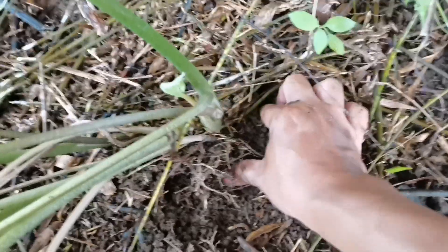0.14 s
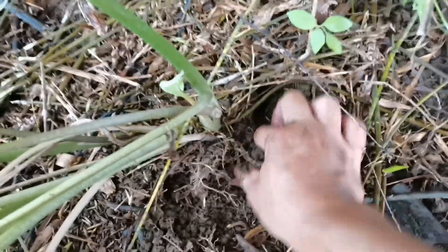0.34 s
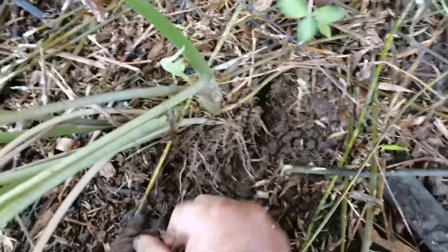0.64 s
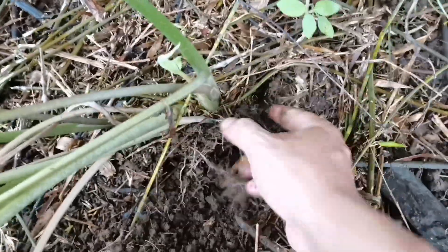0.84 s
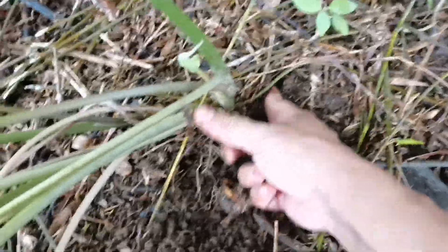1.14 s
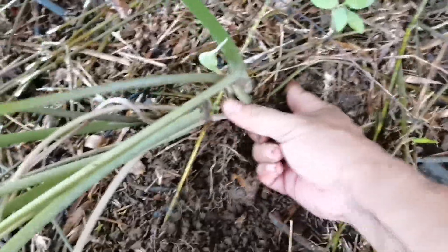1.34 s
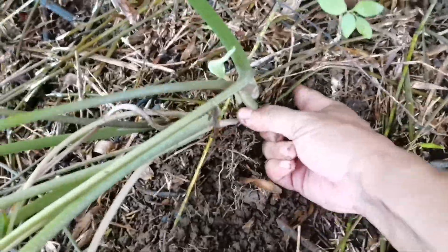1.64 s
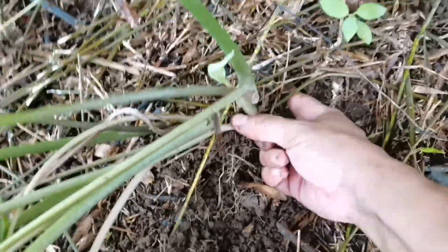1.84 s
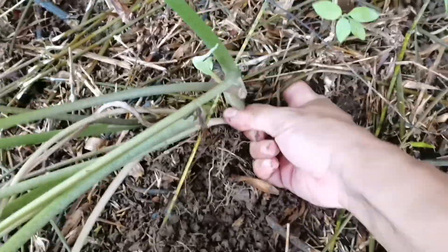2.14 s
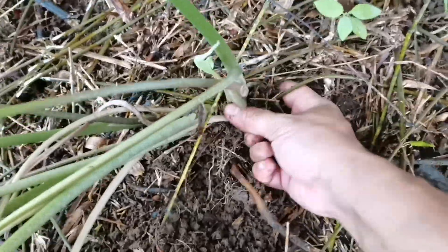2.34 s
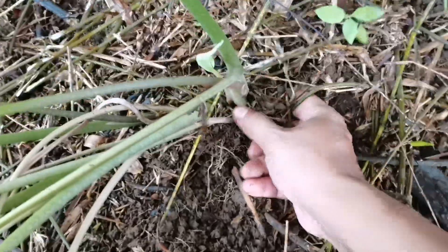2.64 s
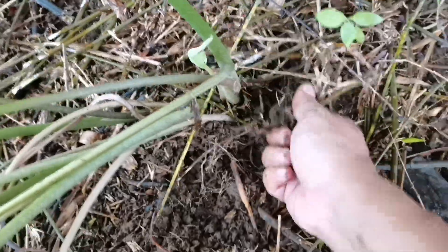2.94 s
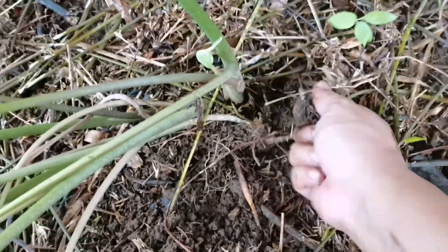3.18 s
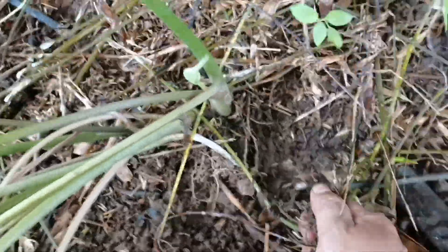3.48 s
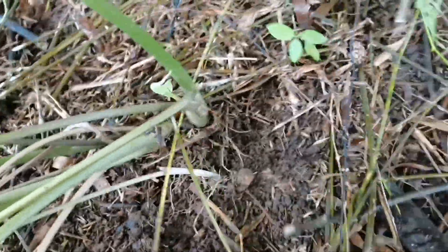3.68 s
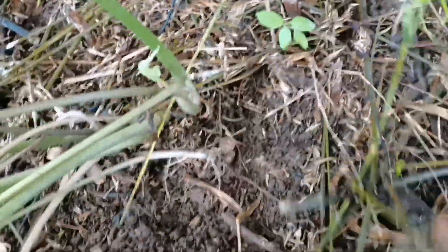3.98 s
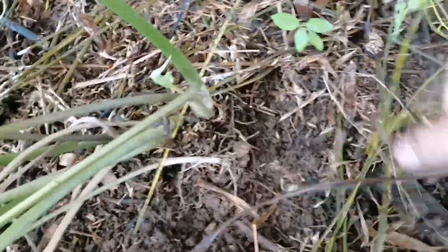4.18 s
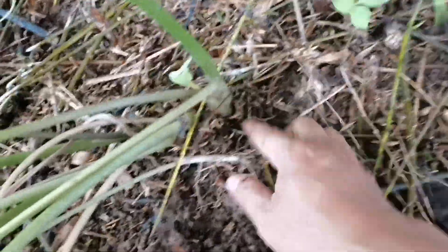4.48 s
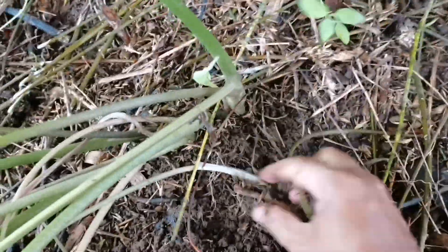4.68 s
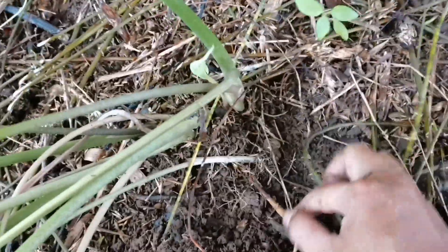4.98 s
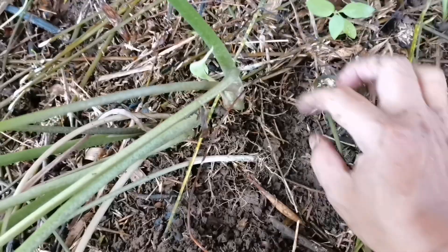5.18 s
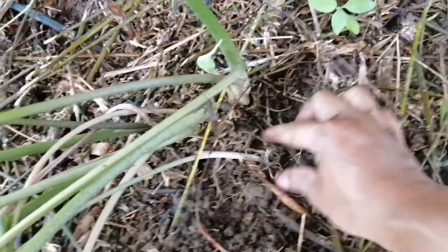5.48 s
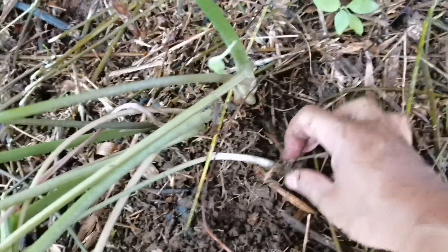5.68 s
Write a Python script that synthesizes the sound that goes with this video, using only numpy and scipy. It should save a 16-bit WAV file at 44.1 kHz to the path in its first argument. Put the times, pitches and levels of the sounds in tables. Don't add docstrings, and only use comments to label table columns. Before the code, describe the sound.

Outdoors in a garden, close stereo perspective. At about 0.3 s a small cluster of dry snaps and a short scrape, then a light brush of soil near 0.5-0.8 s. Faint rustles and ticks follow at 1.1-1.75 s. Around 2.1 s roots and crisp leaves crackle; from 2.5 s gritty scraping grows, with bright leaf snaps at 2.75 s. The peak comes at 3.2-3.4 s: sharp, woody cracks, two far louder than the rest, with crumbling soil and low wind thumps on the left until 3.7 s. Tearing crackle, sliding dust and a tiny squeak continue to about 4.2 s, then scrapes fade by 4.7 s. Only slight touches at 4.8 and 5.1 s remain. Throughout, thin high insect whine and regular cricket chirps, very faint bird peeps, distant traffic rumble and dull engine drones, slightly grainy in the treble, to nearly 5.8 s.

```python
import sys
import numpy as np
from scipy import signal
from scipy.io import wavfile
from scipy.ndimage import uniform_filter1d

SR = 44100
rng = np.random.default_rng(int(sys.argv[2]) if len(sys.argv) > 2 else 0)


def magnitude_from_level(level_db):
    exponent = np.asarray(level_db, float) / 20
    return 10 ** exponent


def inscribe(sig):
    pcm = np.round(np.clip(np.atleast_2d(sig).T, -1, 1) * 32767)
    wavfile.write(sys.argv[1], SR, pcm.astype(np.int16))


N = 256662

# (time [s], peak level [dB], ringing pitch [Hz], brittle top over the peak [dB])
ROOTS = [(0.3154, -30.5, 4390, -11), (2.119, -33, 1550, -3), (2.15, -37.5, 1510, -7),
         (2.193, -35.5, 980, 2), (2.703, -40.5, 1690, -25), (2.922, -41, 1150, 4), (3.014, -36, 1570, -1),
         (3.1, -28.5, 1330, -10), (3.129, -47, 1090, -10), (3.1684, -35.5, 1270, -20),
         (3.292, -23, 1200, -15), (3.337, -39, 960, -23), (3.403, -32, 1203, -13.5), (3.448, -47, 950, -14),
         (3.518, -42, 1690, -7), (3.68, -47, 1500, -19), (3.808, -29, 1660, -11.5),
         (4.146, -29.5, 1385, -21), (4.155, -34, 1430, -13.5), (4.471, -46, 990, -17),
         (4.499, -38.5, 1670, -18), (1.496, -54, 1490, -10), (4.625, -52, 1020, -15),
         (5.641, -61.5, 980, -19)]
STEMS = [(0.193, -56, 2500, -13), (0.277, -26, 1550, -17), (0.489, -43.5, 1380, 8.5),
         (0.520, -53, 2600, -11), (3.813, -31, 1490, 1.5), (0.288, -53, 2090, -10),
         (0.302, -29.5, 3180, -14.5), (0.3133, -29.5, 1470, -14), (1.111, -48, 2780, -8),
         (1.277, -39.5, 2620, -26), (1.699, -49, 2720, -14), (1.749, -36.5, 2500, -4),
         (2.723, -43.5, 2000, -8), (3.0755, -38, 1950, -18), (3.207, -20, 1870, -14.5),
         (3.224, -45, 2550, -3), (3.287, -34.5, 2020, -20), (3.295, -9, 1870, -6.5),
         (3.401, -6.5, 2198, -8), (3.740, -47, 2060, 6), (4.019, -47.5, 2140, 4), (5.08, -45.5, 2430, -14)]
LEAVES = [(1.642, -51, 4500, -6), (1.654, -58.5, 4500, 0), (1.9, -58, 5000, 6), (3.717, -52, 5800, -8),
          (0.165, -62, 4970, 8), (4.029, -47, 4400, 2), (3.051, -53, 5500, -10),
          (1.237, -42.5, 4260, -13.5), (1.571, -43.5, 3870, -8), (1.68, -37, 2800, -5.5),
          (2.138, -38.5, 4000, -11), (2.169, -34.5, 6000, -3), (2.2, -30, 3920, -9), (2.547, -42, 4300, -1),
          (2.636, -40, 3900, -28), (2.7414, -29, 5900, -4), (2.7507, -38, 5500, 0),
          (2.7623, -23.5, 4100, -4), (3.147, -41, 4000, -8), (3.303, -34.5, 4460, -23),
          (3.719, -44, 4400, -4), (3.759, -34, 6200, -8), (3.804, -46, 4000, -6), (3.834, -37.5, 4630, -4),
          (4.173, -49, 5390, 4.5), (4.8, -43, 5300, -2.5), (2.886, -45.5, 5040, 0), (3.1415, -45, 3000, -1),
          (3.0135, -40, 5000, 2), (2.9225, -44, 3500, 4), (3.1005, -38, 4300, -4), (5.085, -50, 4500, -8),
          (4.826, -60, 7000, 8), (4.848, -60, 7000, 8), (0.497, -56, 6000, 8), (3.4, -44, 4200, -15.5),
          (3.1685, -36, 4800, -16), (3.216, -46.5, 6000, 3.5), (2.7018, -42, 2600, -6),
          (3.679, -45.5, 5700, -12), (3.49, -49, 6000, 0.5), (4.2, -48, 6000, 5.5),
          (0.5205, -52, 3800, -2.5), (4.146, -38, 4200, -10), (4.175, -48, 7000, 4)]
# (late fibres [0-1]), then (left over right [dB])
FRAY = [
    0.46,
    0.19,
    0.22,
]
PLACE_DB = [
    4.5,
    4,
    0.5,
]
SCATTER_DB = 4.5
RING, RING_WIDTH = .75, .4
# (frequency [Hz], level [dB])
CRACK_COLOUR = [(240, -43), (400, -4), (489, -14), (826, 0.5), (1580, 0.5), (1790, -5.5), (2150, -1),
                (2840, 1.5), (3260, -7), (4180, 3), (7170, -18.5), (10100, -5.5), (13500, -16.5),
                (15300, -24), (16000, -35.5)]

# (start [s], length [s], effort [dB], fizz over effort [dB], clods over effort [dB])
STROKES = [(-0.03, 0.026, -56, -7, -5), (0.286, 0.03, -54.5, -1.5, -14), (0.476, 0.052, -63.5, 2.5, -4.5),
           (0.577, 0.22, -66.5, -2, -5), (1.098, 0.24, -65.5, -23, -8), (1.638, 0.13, -62.5, -3, -8.5),
           (2.119, 0.085, -54, 1, -4.5), (2.526, 0.21, -59.5, -1, -6), (2.736, 0.029, -53, -3, -1.5),
           (2.768, 0.6, -62, -1, -6), (3.047, 0.25, -61.5, -17, -4.5), (3.193, 0.15, -56, -5, -20),
           (3.393, 0.027, -47, 1.5, -3), (3.49, 0.088, -57.5, -3, -15), (3.665, 0.11, -53.5, -5.5, -25),
           (3.763, 0.11, -48.5, -2, -20), (3.844, 0.026, -54.5, 1, 12.5), (3.874, 0.066, -55.5, -0.5, -19),
           (3.988, 0.12, -56.5, 0, -17), (4.124, 0.054, -51, 0, -17), (3.417, 0.99, -58.5, -2.5, -12),
           (4.412, 0.1, -60, -3, -11), (4.5, 0.066, -65, -3, -12), (4.594, 0.051, -64, -10, -14),
           (4.81, 0.05, -76, 8, 3), (5.067, 0.11, -70.5, 2, -17)]
PRESS_S, SETTLE_S = 0.016, 0.019
RESTING_DB, RESTING_FIZZ_DB, RESTING_CLODS_DB = -76, 1, 1.5
HAND_SWAY_DB, CLUMP_DB = 4, 1.7
# (frequency [Hz], level [dB])
SOIL_COLOUR = [(240, -28), (400, -5), (700, -9.5), (994, -2.5), (1200, -10), (1440, -6), (1900, -10),
               (5600, -9.5), (6340, -8.5), (9040, -7), (11400, -11.5), (14600, -18.5), (16000, -15.5)]

# (pitch [Hz], width [Hz], left [dB], right [dB], throb rate [1/s], throb depth [0-1])
CHORUS = [(7555, 38, -73, -62, 130, 0), (7630, 50, -71.5, -64.5, 20, .3), (7790, 96, -74, -57.5, 17, 0.36),
          (7570, 270, -58, -67.5, 40, 0.07), (8170, 650, -64.5, -68.5, 12, 0.12),
          (9810, 750, -64, -68.5, 17, 0.08), (7270, 880, -72, -63.5, 45, 0.3)]
CRICKET = [(6760, 70, -68.5, -59, 45, 0.26), (6532, 77, -71, -69, 45.5, -0.5)]
KATYDIDS = [(7040, 40, -78, -73, 45, .2), (9760, 110, -65, -68, 30, .2), (10270, 200, -68, -72, 18, .2)]
# (start [s], end [s])
PHRASES = [
    (-.2, .3),
    (.72, 1.38),
    (1.8, 2.47),
    (2.91, 3.63),
    (4.06, 4.78),
    (5.12, 5.86),
]
# (start [s], end [s])
BOUTS = [
    [(.3, 1.), (1.6, 3.3), (4.3, 4.9)],
    [(1.3, 1.9), (4.9, 5.45)],
    [(.55, 1.4), (2.2, 2.6), (5.15, 5.3)],
]
START_S, STOP_S = .14, .05

# (time [s], length [s], pitch [Hz], level [dB], glide [share of pitch])
PEEPS = [
    (2.228, .075, 3020, -72, .04),
    (3.543, .012, 2950, -55, 0),
    (5.69, .13, 1790, -76, -.12),
    (4.31, .05, 3200, -66, 0),
    (3.757, .007, 6250, -50, 0),
    (4.132, .010, 4500, -41, .05),
    (3.68, .03, 1550, -60, 0),
    (3.555, .02, 3000, -64, 0),
    (4.158, .012, 4400, -54, 0),
    (4.115, .016, 4350, -56, 0),
]

# (time [s], peak level [dB], pitch [Hz])
THUMPS = [(1.379, -34, 70), (3.32, -30, 59.4), (3.409, -24.5, 130.3), (3.427, -25.5, 107.7),
          (3.436, -27, 110), (3.471, -23.5, 105), (3.49, -27, 62.6), (3.511, -31.5, 80), (3.561, -23, 67.4),
          (3.602, -31.5, 50), (3.618, -28, 62.3), (3.655, -29.5, 69.6), (3.679, -28.5, 82),
          (5.736, -29.5, 60.5)]
# (time [s], level [dB])
AIR = [(0, -58.5), (.9, -56), (1.35, -55), (1.6, -48.5), (1.85, -58), (2.08, -51.5), (3.1, -51),
       (3.25, -45), (3.57, -43), (3.72, -65), (4.08, -70.5), (4.2, -52), (4.4, -65), (4.55, -45),
       (4.73, -57.5), (5.0, -59.5), (5.15, -44), (5.82, -59)]
# (frequency [Hz], level [dB])
AIR_COLOUR = [(20, -8.5), (50, 5.5), (100, 0), (160, -8.5), (300, -37.5), (600, -47.5)]

# (frequency [Hz], level [dB])
FAR_COLOUR = [(12, -35), (22, -9.5), (65, -5.5), (135, -0.5), (243, -3), (330, -10.5), (480, -17.5),
              (600, -27), (963, -27), (2200, -30.5), (4000, -32), (5970, -35.5), (8840, -27), (11100, -38),
              (14800, -34), (16400, -85)]
# (frequency [Hz], correlation [-1 to 1])
LIKENESS = [(60, 0.64), (150, 0.88), (380, 0.65), (950, -0.29), (2380, 0.07), (5980, -0.51),
            (15000, -0.088)]
# (frequency [Hz], left over right [dB])
BALANCE = [(60, 3.5), (150, 7.5), (380, 2), (950, -2), (2380, 2.5), (5980, -3.5), (15000, -1)]
# (time [s], rumble level [dB])
TRAFFIC = [(0.0, -56.5), (0.97, -57), (2.33, -56.5), (2.92, -55.5), (3.44, -53.5), (3.78, -55.5),
           (4.59, -57), (4.88, -55), (5.75, -54), (5.82, -52)]
FAR_DB, RUMBLE_SWELL_DB, RUMBLE_SWELLS_PER_S = -53, 0.57, 4.6
# (start [s], end [s], pitch [Hz], width [Hz], level [dB])
DRONES = [
    (-0.16, 1.56, 254.5, 38, -65),
    (2, 2.4, 187, 25, -57),
    (4, 4.95, 111.5, 27, -57),
    (5.5, 7.7, 254, 50, -67),
    (1.5, 2.3, 148, 35, -59.5),
    (5, 5.9, 1010, 520, -75),
    (0.5, 1.08, 497, 130, -76),
]

# (frequency [Hz], step over the local level [dB])
COARSENESS = [(300, -30), (600, -20), (900, -14), (1200, -10), (1600, -3.5), (2200, 0), (2900, 2.5),
              (4000, 1.5), (5200, 5), (6200, 2), (6800, -11), (7600, -16), (8300, -11), (8900, 1),
              (9600, -9), (10500, -6), (11500, 1), (13000, 1.5), (14500, 4.5), (15200, 12), (15500, 28)]
UNEVEN_DB, FOLLOW, SUDDEN_DB = 6, .8, 10.5
OVERLOAD = .62


def evened(x):
    return x / np.sqrt(np.mean(x ** 2) + 1e-20)


def read(points, hz):
    f, value = np.transpose(points)
    return np.interp(np.log(hz + 1), np.log(f + 1), value)


def band(x, lo_hz, hi_hz):
    return signal.sosfilt(signal.butter(2, [lo_hz, hi_hz], "band", fs=SR, output="sos"), x)


def drift(per_s, channels=1):
    steps = rng.standard_normal((channels, N // 128 + 2))
    slow = evened(signal.sosfilt(signal.butter(2, per_s, fs=SR / 128, output="sos"), steps))
    return np.array([np.interp(np.arange(N) / 128, np.arange(len(v)), v) for v in slow])


def causal(points):
    hz = abs(np.fft.fftfreq(4096, 1 / SR))
    log_gain = np.log(magnitude_from_level(np.maximum(read(points, hz), -90)))
    return np.fft.ifft(np.exp(np.conj(signal.hilbert(log_gain)))).real[:1024]


def coloured(x, points):
    return signal.oaconvolve(x, causal(points)[None], axes=1)[:, :N]


def resonate(x, hz, width):
    return signal.lfilter(*signal.iirpeak(hz, hz / width, SR), x)


def sides(pan_db):
    return magnitude_from_level(np.array([pan_db, -pan_db]) / 2)


def gate(spans, start_s, stop_s):
    t = np.arange(N) / SR
    return sum(np.clip(np.minimum((t - a) / start_s, (b - t) / stop_s), 0, 1) for a, b in spans)


def peaked(x):
    return x / abs(x.mean(0)).max()


def snap(db, hz, top_db, fray, pan_db, fibres, colour):
    t = np.arange(fibres.shape[1]) / SR
    burst = np.exp(-abs(t - .0012) / .00018)
    echo = np.roll(burst, round(.002 * SR))
    late = np.clip(fray, 0, 1) * np.exp(-t / .0035) + .012 * np.exp(-t / .025)
    late *= np.clip(t / .0016, 0, 1) ** 3
    parting = np.arange(len(t)) == round(.0012 * SR)
    crack = fibres * (.45 * burst + .13 * echo + late) + 3.5 * parting
    ports = [crack[0], .65 * crack[0] + .55 * crack[1]]
    crack = signal.fftconvolve(ports, colour[None], axes=1)[:, :len(t)]

    brightness = np.clip(-.016 * (db + 2), 0, 1)
    broad = peaked(band(crack, 0.25 * hz, 10000.0)) + brightness * peaked(band(crack, 4000.0, 10000.0))
    body = peaked(broad + RING * peaked(resonate(crack, hz, RING_WIDTH * hz)))
    top = magnitude_from_level(top_db + np.array([[9.5], [6.5]])) * peaked(band(crack, 9230.0, 19000.0))
    top[1] = .8 * np.roll(top[1], 1) + .35 * top[1]
    thud_db = -27.0 - 1.3 * np.log2(hz / 1500)
    thud = magnitude_from_level(thud_db) * peaked(band(crack, 330.0, 800.0))
    return magnitude_from_level(db) * sides(pan_db)[:, None] * (body + top + thud)


def snaps():
    out, colour = np.zeros((2, N + 2048)), causal(CRACK_COLOUR)
    for table, fray, place_db in zip([ROOTS, STEMS, LEAVES], FRAY, PLACE_DB):
        noise = rng.standard_normal((len(table), 2, 2049))
        for (s, *row), fibres in zip(table, noise):
            pan_db = place_db + SCATTER_DB * fibres[0, -1]
            out[:, round(s * SR):][:, :2048] += snap(*row, fray, pan_db, fibres[:, :-1], colour)
    return out[:, :N]


def strokes():
    t = np.arange(N) / SR
    resting_db = RESTING_DB + np.array([[0], [RESTING_FIZZ_DB], [RESTING_CLODS_DB]])
    power = magnitude_from_level(resting_db) ** 2 * np.ones(N)
    for s, length, db, fizz_db, clod_db in STROKES:
        shape = np.clip((t - s) / PRESS_S, 0, 1) * np.exp(-np.maximum(t - s - length, 0) / SETTLE_S)
        power += (magnitude_from_level(db + np.array([[0], [fizz_db], [clod_db]])) * shape) ** 2
    return np.sqrt(power)


def clumped(x):
    z = signal.stft(x, nperseg=512)[2]
    patches = uniform_filter1d(rng.standard_normal(z.shape[1:]), size=7, axis=0)
    patches = uniform_filter1d(patches, size=7, axis=1)
    return signal.istft(z * magnitude_from_level(CLUMP_DB * evened(patches)), nperseg=512)[1][:, :N]


def crumbs():
    effort, dry_gain, clod_gain = strokes()
    pan_db = HAND_SWAY_DB * drift(7.9)[0]
    size = magnitude_from_level(3.6 * np.minimum(rng.exponential(1, N), 3.))
    size *= (rng.random(N) < 1500 / SR) * rng.choice([-1, 1], N)
    kind, breaks = rng.integers(0, 10, N), np.zeros((2, N))
    for k, hz in enumerate(np.geomspace(700., 13000., num=10)):
        ring = resonate(size * (kind == k), hz, 0.19 * hz)
        breaks += [ring, np.roll(ring, rng.integers(-8, 9))]
    dust = rng.standard_normal((3, N))
    grit = 1.1 * np.clip(effort / magnitude_from_level(-66), 0, 1) * evened(breaks) + 0.5 * dust[0] + 1.4 * dust[1:]
    grit *= magnitude_from_level(1.3 * drift(140.))
    grit = clumped(coloured(grit, SOIL_COLOUR))

    def layer(lo_hz, hi_hz):
        return magnitude_from_level(.6 * drift(25.4)) * evened(band(grit, lo_hz, hi_hz))

    body = magnitude_from_level(4.5) * effort * layer(1222.0, 10000.0) * sides(pan_db)
    fizz = magnitude_from_level([[4.5], [1.5]]) * dry_gain * layer(8950.0, 13700.0)
    clods = magnitude_from_level([[2.5], [-.5]]) * clod_gain * layer(333.0, 1610.0)
    return body + fizz + clods


def stridulate(hz, width, left_db, right_db, per_s, depth, swell_db=2.0):
    turns = np.cumsum(per_s * (1 + 0.044 * drift(4.1)[0])) / SR
    whistle = resonate(resonate(rng.standard_normal((2, N)), hz, width), hz, width)
    throb = 1 + np.clip(depth, 0, 1) * np.cos(2 * np.pi * turns)
    level_db = [[left_db], [right_db]] + swell_db * drift(0.78, channels=2)
    return magnitude_from_level(level_db) * evened(whistle * throb)


def insects():
    out = sum(stridulate(*voice) for voice in CHORUS)
    for voice, phrases in zip(CRICKET + KATYDIDS, [PHRASES, PHRASES] + BOUTS):
        out += stridulate(*voice, swell_db=.6) * gate(phrases, START_S, STOP_S)
    return out


def bird():
    out = np.zeros(N)
    for s, length, hz, db, glide in PEEPS:
        part = out[round(s * SR):][:round(length * SR)]
        waver = .025 * evened(uniform_filter1d(rng.standard_normal(len(part)), size=150))
        pitch = 1 + glide * np.linspace(-.5, .5, len(part)) + waver
        part += magnitude_from_level(db + 6) * np.sin(2 * np.pi * hz * np.cumsum(pitch) / SR) * np.hanning(len(part))
    return out


def gusts():
    lumps = magnitude_from_level(4.1 * drift(10.0, channels=2))
    air = coloured(rng.standard_normal((2, N)) * lumps, AIR_COLOUR)
    air_db = np.interp(np.arange(N) / SR, *np.transpose(AIR))
    eddies = np.zeros(N)
    for s, db, hz in THUMPS:
        u = np.pi * hz * np.arange(-1500, 1500) / SR
        push = (1 - 2 * u ** 2) * np.exp(-u ** 2)
        eddies[round(s * SR) - 1500:][:3000] += magnitude_from_level(db) * push
    return magnitude_from_level(air_db) * evened(air) * magnitude_from_level([[3.1], [-16]]) + eddies * magnitude_from_level([[-.5], [-24]])


def surroundings():
    frames, hz = N // 512 + 5, np.fft.rfftfreq(2048, 1 / SR)
    a, b, c, d, patches = rng.standard_normal((frames, 1025, 5)).T
    patches = evened(uniform_filter1d(uniform_filter1d(patches, size=4, axis=0), size=10, axis=1))
    same = np.clip(read(LIKENESS, hz), -1, 1)[:, None]
    left = a + 1j * b
    z = np.array([left, same * left + np.sqrt(1 - same ** 2) * (c + 1j * d)])
    swell_db = np.interp(np.arange(frames) * 512 / SR, *np.transpose(TRAFFIC))
    swell_db += RUMBLE_SWELL_DB * np.resize(drift(RUMBLE_SWELLS_PER_S)[0, ::512], frames)
    low = 1 / (1 + (hz[:, None] / 600) ** 4)
    moving_db = low * (2.96 * patches + swell_db - swell_db.mean())
    z *= magnitude_from_level(read(FAR_COLOUR, hz)[:, None] + moving_db)
    z *= sides(read(BALANCE, hz))[:, :, None]
    return magnitude_from_level(FAR_DB) * evened(signal.istft(z, nperseg=2048, noverlap=1536)[1][:, :N])


def engines():
    noise, tones = rng.standard_normal(N), np.zeros(N)
    for a, b, hz, width, db in DRONES:
        tone = evened(resonate(resonate(noise, hz, width), hz, width))
        tones += magnitude_from_level(db) * gate([(a, b)], 0.099, 0.069) * tone
    return tones * sides(6.3)[:, None]


def scene():
    return snaps() + crumbs() + insects() + bird() + gusts() + surroundings() + engines()


def rounded(x):
    n, k, count = np.arange(2048) + .5, np.arange(768) + .5, (N - 790) // 1024 - 1
    end = 790 + 1024 * (count + 1)
    window = np.sin(np.pi * n / 2048)[:, None]
    basis = np.cos(np.pi / 1024 * np.outer(n + 512, k)) * window / np.sqrt(512)
    halves = x[:, 790:end].reshape(2, count + 1, 1024)
    blocks = np.concatenate([halves[:, :-1], halves[:, 1:]], axis=2)
    lines = np.tensordot(blocks, basis, axes=1)

    level_db = 10 * np.log10(abs(uniform_filter1d((lines ** 2).mean(0), size=33, axis=1)) + 1e-16)
    usual_db = np.median(level_db, axis=0)
    uneven = evened(uniform_filter1d(rng.standard_normal((count, 96)), size=3, axis=0))
    uneven_db = UNEVEN_DB * np.repeat(uneven, 8, axis=1)
    step_db = usual_db + FOLLOW * (level_db - usual_db) + read(COARSENESS, k * SR / 2048) + uneven_db
    step = magnitude_from_level(step_db)

    edge = np.diff(blocks.mean(0), prepend=0)[:, ::-1] ** 2
    edge = edge.reshape(count, 16, 128)[:, :15].mean(axis=2)
    steady = edge.max(axis=1) < magnitude_from_level(SUDDEN_DB) ** 2 * np.median(edge, axis=1)
    error = (np.sign(lines) * np.floor(abs(lines) / step + .4) * step - lines) * steady[:, None]
    back = np.tensordot(error, basis.T, axes=1)
    lapped = np.pad(back[..., :1024], ((0, 0), (0, 1), (0, 0)))
    lapped += np.pad(back[..., 1024:], ((0, 0), (1, 0), (0, 0)))
    return x + np.pad(lapped.reshape(2, -1), ((0, 0), (790, N - end)))


def roll_off(x):
    return signal.sosfilt(signal.butter(12, 16560, fs=SR, output="sos"), x)


def record(dry):
    limited = OVERLOAD * np.tanh(dry / OVERLOAD)
    limited = signal.oaconvolve(limited, signal.firwin(201, 16400, fs=SR)[None], "same")
    under_cricket = signal.firwin(401, (5600, 6420), pass_zero=False, fs=SR)
    faint = signal.oaconvolve(limited, under_cricket[None], "same")
    quiet = uniform_filter1d(faint ** 2, size=2048) < magnitude_from_level(-77) ** 2
    duck = (1 - magnitude_from_level(-18)) * gate(PHRASES, START_S, STOP_S) * uniform_filter1d(quiet * 1., size=1024)
    return roll_off(rounded(limited - duck * faint))


dry = scene()
out = record(dry)
inscribe(out)
```